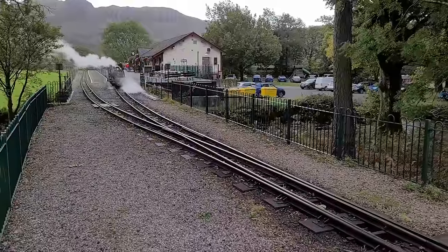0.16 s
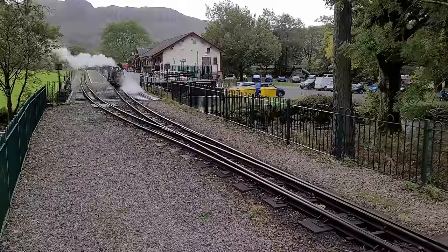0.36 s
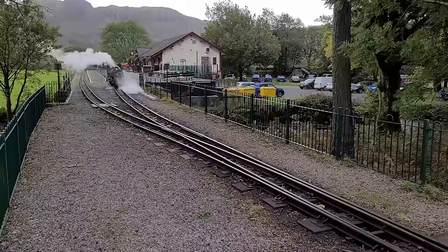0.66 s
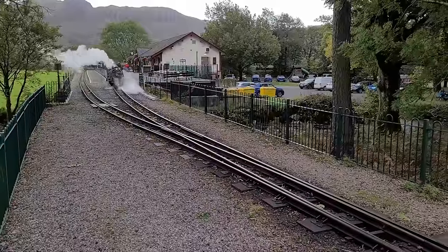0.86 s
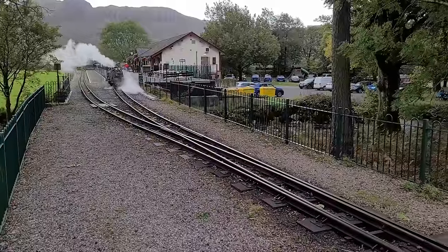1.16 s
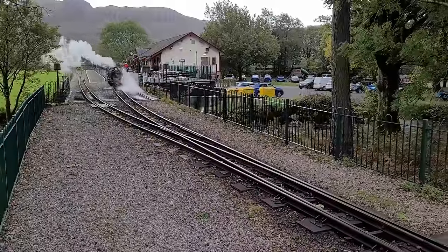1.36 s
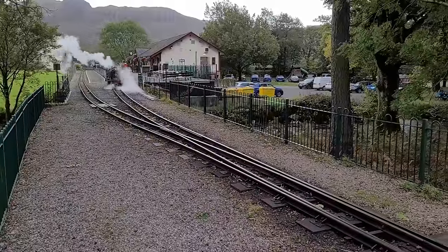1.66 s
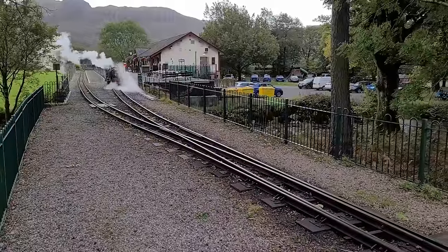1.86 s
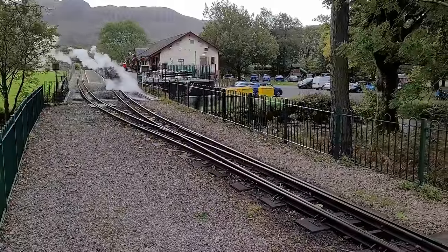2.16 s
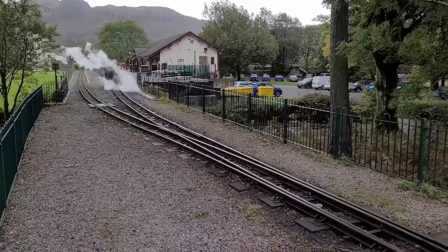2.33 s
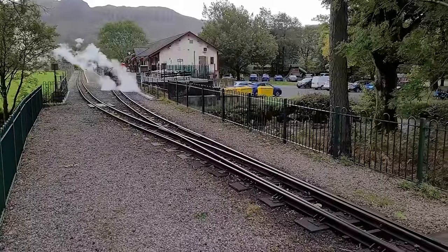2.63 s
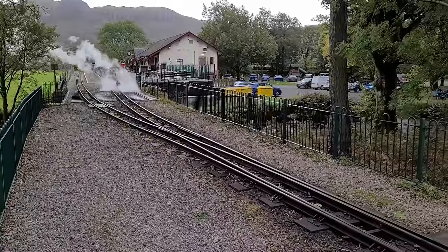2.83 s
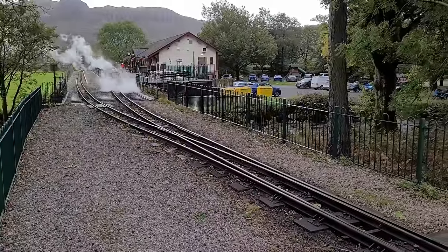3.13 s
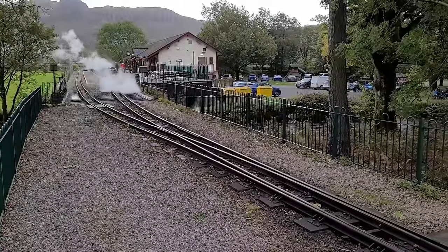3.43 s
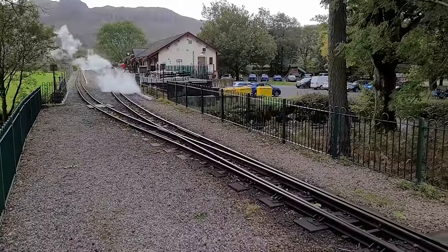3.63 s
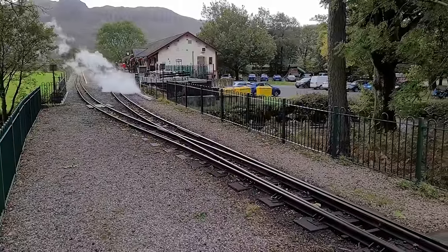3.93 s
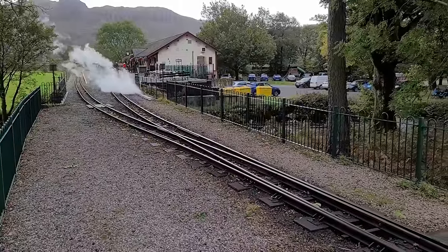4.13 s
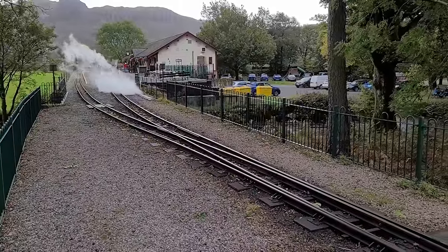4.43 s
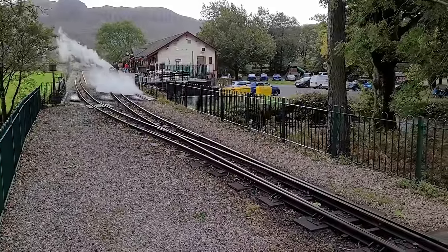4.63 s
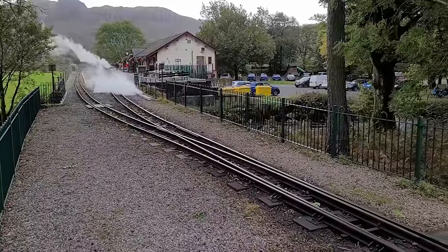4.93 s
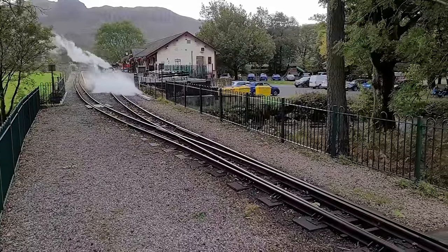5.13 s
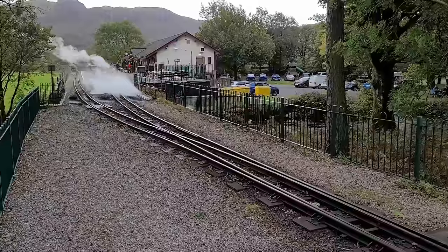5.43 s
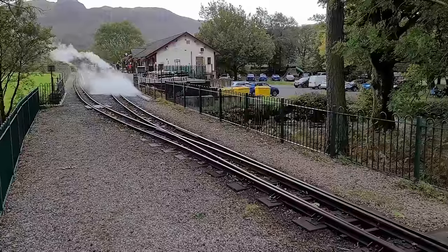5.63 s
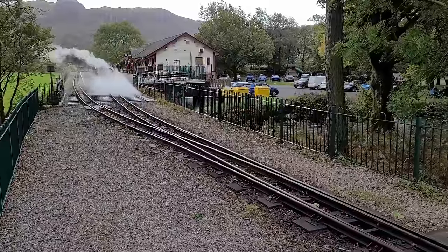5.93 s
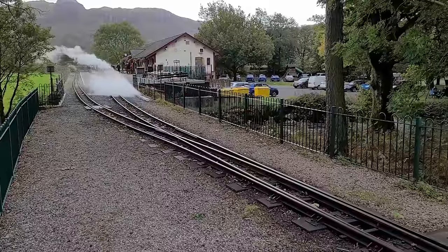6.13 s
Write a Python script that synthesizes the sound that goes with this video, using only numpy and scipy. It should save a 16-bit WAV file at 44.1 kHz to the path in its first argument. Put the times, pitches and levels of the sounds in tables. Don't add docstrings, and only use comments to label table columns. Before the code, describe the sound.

A distant small steam locomotive vents steam, its thin hiss swelling in steps to a wide steady rush while wind buffets the microphone.

```python
import sys
import numpy as np
from scipy import signal
from scipy.fft import rfft, irfft, next_fast_len
from scipy.io import wavfile
from scipy.ndimage import uniform_filter1d, map_coordinates

SR = 44100
rng = np.random.default_rng(int(sys.argv[2]) if len(sys.argv) > 2 else 0)


def gain_from_db(level_db):
    decades = np.asarray(level_db, float) / 20
    return 10 ** decades


def unload_audio(sound):
    columns = np.transpose(np.atleast_2d(sound))
    steps = np.round(np.clip(columns, -1, 1) * 32767)
    wavfile.write(sys.argv[1], SR, steps.astype(np.int16))


N = 276948

# time in seconds, hiss level in dB.
STEAM_FLOW = [(0, -51.5), (.28, -45), (.6, -42), (1.0, -42), (1.4, -41), (1.57, -34.5), (1.85, -35),
              (2.4, -33.5), (2.66, -36), (2.97, -30.5), (3.3, -31), (3.75, -30.5), (4.4, -31.5),
              (5.1, -31.5), (5.7, -31), (6.28, -30.5)]
# frequency in Hz, density in dB per Hz.
JET_COLOUR = [(900, -5), (1150, -2.5), (2100, -4), (4200, -4.5), (5200, -4.5), (6200, -5), (7800, -6.5),
              (9400, 1), (10500, 3), (11800, 2), (13300, 3), (14600, 4), (15500, 2)]
# frequency in Hz, width in Hz, lift in dB.
JET_PEAKS = [(2580, 100, 2.5), (2820, 150, 2), (4960, 80, 3.5), (6770, 75, 8), (8400, 300, 2),
             (10430, 250, 7), (5700, 170, 7), (6120, 200, 6), (3950, 170, 4), (4370, 180, 4),
             (10950, 270, 4), (7440, 120, 5.5)]
# frequency in Hz, width in Hz, lift in dB.
SHELL_PEAKS = [(4650, 110, 1), (5770, 120, -2), (6450, 180, 1), (6800, 150, -2), (7600, 120, -1.5),
               (8480, 200, -0.5), (9000, 150, 3), (9500, 120, 0.5), (9800, 180, 2), (10150, 200, 1),
               (11850, 200, 1), (12350, 250, -1.5), (13000, 250, 0), (13450, 180, -2), (14470, 200, 2.5),
               (15230, 250, 1)]
# frequency in Hz, density in dB per Hz.
CLOUD_COLOUR = [(900, -13), (1150, -9), (2100, -5), (4200, -4.5), (5200, -2.5), (6200, 0), (7800, -3),
                (9400, 0.5), (10500, 5), (11800, -3), (13300, -2), (14600, 0), (15500, -1)]
# frequency in Hz, width in Hz, lift in dB.
CLOUD_PEAKS = [(2520, 120, 1.5), (3200, 170, 1), (4370, 190, 4), (5620, 150, 4), (6050, 150, 0.5),
               (6940, 300, 0)]
# delay in ms, gain as a ratio.
PORT_PATHS = [(-1.706, -0.06), (-0.425, 0.08), (-0.017, -0.13), (0.119, 0.28), (0.21, 0.11), (0.317, 0.05),
              (0.38, 0.17), (0.425, 0.17), (0.454, 0.07), (0.584, 0.12), (0.777, 0.06), (0.833, 0.05),
              (0.947, -0.06), (1.003, -0.06), (1.321, -0.05), (1.559, 0.06), (1.604, 0.1), (1.655, 0.09),
              (1.978, 0.09), (2.035, 0.13), (2.086, 0.06), (2.307, -0.06)]
# delay in ms, ripple in dB.
RIPPLE_LEFT = [(0.465, 0.37), (0.567, 0.3), (0.765, -0.44), (0.845, 0.31), (1.066, -0.29), (1.111, -0.42),
               (1.576, -0.48), (1.82, -0.44), (1.927, 0.46), (2.029, 0.45), (2.092, 0.32), (2.296, -0.23),
               (2.358, 0.31), (2.772, -0.29), (2.885, -0.39), (3.424, 0.35)]
# delay in ms, ripple in dB.
RIPPLE_RIGHT = [(0.295, -0.33), (0.351, -0.48), (0.459, 0.44), (0.522, -0.39), (0.782, -0.31),
                (1.003, 0.42), (1.1, -0.47), (1.213, 0.58), (1.383, 0.44), (1.446, 0.4), (1.576, -0.31),
                (1.638, 0.28), (1.757, -0.3), (1.927, 0.49), (2.347, 0.32), (2.868, -0.26)]
# time in seconds, gain in dB, treble gain in dB, width in ms.
PATH_EDDIES = [(.05, 1, 9.5, 79), (.16, 2, -3, 35), (.33, 2.5, 2, 48), (.4, -3, 1, 32), (.57, -1.5, 3, 32),
               (1.08, 0.5, -2.5, 20), (1.13, -7.5, 6, 18), (1.22, -1.5, 3, 40), (1.56, 0, 1.5, 40),
               (1.81, -0.5, -3, 94), (2.07, -0.5, 4.5, 45), (2.18, 0.5, -2, 31), (2.31, -1.5, 3, 45),
               (2.5, -4, 2, 9.1), (2.71, -2.5, 5, 22), (3.0, 1.5, -2, 45), (3.15, 0.5, 5.5, 46),
               (3.34, 0.5, -2, 47), (3.5, -0.5, 0.5, 83), (3.73, -0.5, -5, 61), (3.95, -1.5, 3, 32),
               (4.25, 2, 0, 17), (4.39, -2.5, 5, 23), (4.78, -0.5, 0.5, 65), (5.29, 1, -1, 64),
               (5.47, -4.5, 1.5, 21), (5.57, 1.5, 0.5, 35), (5.96, -1, 2, 94)]
# time in seconds, throat gain in dB, fizz gain in dB,
# width in ms.
SWIRLS = [(.12, -1, 1.5, 40), (.33, -2.5, -1.5, 50), (.55, -4, -1, 30), (.78, 2.5, 0, 35),
          (.98, -1, -7, 50), (1.2, 1, 2, 30), (1.42, 0.5, .5, 40), (1.67, -0.5, -2, 50), (1.85, 5, 1.5, 61),
          (2.07, 0.5, 2, 35), (2.2, 0, -2, 30), (2.32, 1, 1.5, 25), (2.55, -1.5, -2, 45), (2.67, 3, 1, 33),
          (2.77, 4.5, 4, 25), (2.87, 2.5, 4, 25), (3.0, 0.5, 1, 50), (3.1, 3, 4, 46), (3.2, -1, 1, 30),
          (3.36, 1.5, 6, 30), (3.47, 5, -3, 45), (3.6, -1.5, -3, 40), (3.92, 0.5, 0, 40), (4.1, -2, 0, 45),
          (4.35, -1.5, -1, 40), (4.6, -0.5, 1, 66), (4.95, -0.5, 2, 67), (5.25, 0.5, 3, 38),
          (5.55, 1, 0, 40), (5.72, -0.5, 1, 60), (6.1, 0.5, -0.5, 90)]
# frequency in Hz, left over right in dB.
STEAM_LEAN = [(500, -0.5), (2500, 0.9), (6400, 0.1), (10000, 1.8), (15000, 1.7)]
# time in seconds, wind level in dB, left over right in dB.
BREEZE = [(0, -38.5, 11), (.25, -37.5, 15), (.5, -42.5, 11.5), (.8, -39, 9), (1.3, -42.5, 7),
          (1.68, -32, 5), (2.25, -36, 14), (2.55, -41.5, 17), (3.0, -42.5, 0), (3.35, -44.5, 7),
          (3.75, -38.5, 11), (4.0, -44.5, 4), (4.4, -35, 1), (4.8, -44, 4), (5.1, -40.5, -1),
          (5.35, -40, 10), (5.75, -36.5, -3.5), (6.28, -40.5, -6)]
# time in seconds, left gain in dB, right gain in dB,
# width in ms.
LULLS = [(.02, 1, -19, 32), (.12, -1, -10, 36), (.28, -1.5, -19, 35), (.42, -25, -15, 29),
         (.63, -3, -20, 25), (.93, 3, -2, 18), (1.15, 7, -19, 27), (1.27, 1, -11, 25), (1.39, 5, -11, 31),
         (1.59, -10, -27, 32), (1.79, -3, -22, 43), (2.36, -5, -18, 25), (2.67, -6, -17, 48),
         (2.85, 2, -7, 25), (3.17, 0.5, -24, 50), (3.5, -9, -18, 60), (3.68, 1.5, -7, 28),
         (4.01, -7, -14, 53), (4.42, 3, -20, 32), (4.72, 7.5, -18, 27), (4.86, -9, -1, 13),
         (4.2, -9, -1, 11), (5.06, -16, -4, 30), (5.17, -23, -1, 18), (5.46, -7, -23, 29),
         (5.72, -22, -1, 29), (5.84, 6, -7, 28), (6.05, -7, -13, 25), (6.22, -19, -7, 36)]
# time in seconds, rumble level in dB, flutter level in dB.
GUSTS_LEFT = [(0.052, -33, -27), (0.147, -35, -35), (0.21, -24.5, -28), (0.397, -34, -60),
              (0.444, -35, -62), (0.676, -28, -32), (0.764, -34, -44), (0.812, -41, -35), (0.851, -34, -42),
              (0.99, -32, -60), (1.019, -40, -36), (1.084, -26.5, -31.5), (1.123, -31, -33),
              (1.207, -26.5, -28), (1.419, -31, -57), (1.456, -30, -35), (1.508, -34, -50),
              (1.585, -33, -32.5), (1.669, -32, -32), (1.734, -27, -28), (1.784, -26.5, -35),
              (1.847, -34, -40), (1.873, -36, -36), (1.984, -28, -24.5), (2.009, -27, -28),
              (2.057, -38, -32), (2.106, -25.5, -32), (2.179, -22, -35), (2.242, -19, -25),
              (2.388, -26, -37), (2.415, -24, -34), (2.469, -42, -39), (2.552, -41, -38),
              (2.623, -30.5, -40), (2.767, -32, -48), (3.274, -33, -44), (3.318, -40, -47),
              (3.575, -36, -39), (3.605, -34, -48), (3.722, -27, -29), (3.828, -34, -53), (4.03, -53, -36),
              (4.142, -34, -36), (4.21, -41, -27), (4.277, -24, -23), (4.532, -46, -35), (4.641, -39, -37),
              (4.993, -33, -43), (5.053, -56, -36), (5.105, -49, -33.5), (5.263, -36, -50),
              (5.303, -39, -36), (5.365, -26, -37), (5.456, -31, -34), (5.585, -27.5, -36),
              (5.632, -43, -29), (5.75, -57, -41), (5.876, -37, -33), (5.916, -29, -31), (6.138, -38, -42)]
# time in seconds, rumble level in dB, flutter level in dB.
GUSTS_RIGHT = [(0.055, -59, -33.5), (0.15, -54, -40.5), (0.209, -40, -28), (0.679, -28, -35),
               (0.767, -35, -55), (0.856, -33, -49), (1.019, -47, -35), (1.084, -34, -42),
               (1.126, -54, -32.5), (1.206, -46, -34), (1.463, -36, -47), (1.509, -33, -51),
               (1.591, -58, -41), (1.669, -35, -37), (1.739, -52, -30), (1.844, -49, -45),
               (1.886, -28, -38), (1.951, -45, -35), (2.009, -26, -31), (2.073, -35, -35),
               (2.101, -24, -33.5), (2.192, -25, -33), (2.244, -25, -25), (2.29, -20.5, -30.5),
               (2.378, -56, -34), (2.415, -33, -60), (2.471, -41, -31.5), (2.552, -39, -40),
               (2.766, -32, -49), (2.875, -47, -40), (3.132, -57, -41), (3.257, -55, -37),
               (3.459, -57, -45), (3.58, -54, -39), (3.605, -38, -36), (3.731, -27, -36), (3.93, -46, -40),
               (4.035, -52, -35), (4.137, -35, -38), (4.205, -31, -37), (4.263, -19.5, -25),
               (4.291, -36, -25.5), (4.464, -40, -35.5), (4.507, -40, -41), (4.576, -30, -46),
               (4.642, -43, -33.5), (5.157, -35, -60), (5.221, -36, -60), (5.26, -34, -37),
               (5.303, -34, -34), (5.351, -35, -30.5), (5.444, -53, -31), (5.508, -37, -60),
               (5.582, -32, -42), (5.612, -32, -32), (5.776, -33, -60), (5.874, -37, -34), (5.92, -27, -37),
               (5.952, -35, -40), (6.112, -34, -50)]
# frequency in Hz, density in dB per Hz.
RUMBLE_COLOUR = [(15, -36), (30, -11), (42, 4), (58, 1), (125, -1), (190, -7), (240, -38)]
# frequency in Hz, density in dB per Hz.
FLUTTER_COLOUR = [(150, -42), (210, 1.5), (290, 1), (390, -8.5), (480, -14), (750, -25), (1200, -31),
                  (2000, -55)]
# frequency in Hz, density in dB per Hz.
LEAF_COLOUR = [(250, -25), (500, -18), (750, 7.5), (1000, -6.5), (1500, -2.5), (2500, -6.5), (4000, -9)]
# frequency in Hz, density in dB per Hz.
ROAR_COLOUR = [(170, -48), (225, -5), (262, -6.5), (305, -5), (440, -8), (540, -5), (615, -3), (700, -9.5),
               (820, -15.5), (1000, -22.5), (1400, -70)]

FULL_DB = -31


def unit(x):
    return x / np.sqrt(np.mean(x ** 2, axis=-1, keepdims=True) + 1e-20)


def along(points, hz):
    f, v = np.transpose(points)
    return np.interp(np.log(hz + 1), np.log(f + 1), v, left=-120, right=-120)


def peaks_db(peaks, hz):
    return sum(db / (1 + (2 * (hz - centre_hz) / width) ** 2) for centre_hz, width, db in peaks)


def curves(rows):
    s, *cols = np.transpose(rows)
    return [np.interp(np.arange(N) / SR, s, c) for c in cols]


def passing(rows):
    t = np.arange(0, N, 64) / SR
    s, *dbs, ms = np.transpose(rows)
    bumps = np.exp(-.5 * ((t[:, None] - s) / (ms / 1000)) ** 2)
    return [np.interp(np.arange(N) / SR, t, bumps @ db) for db in dbs]


def wobble(rate):
    return map_coordinates(rng.standard_normal(int(N * rate / SR) + 4), [np.arange(N) * rate / SR])


def filtered(x, response):
    m = next_fast_len(N + 8192)
    return irfft(rfft(x, m) * response(np.fft.rfftfreq(m, 1 / SR)), m)[..., :N]


def echoes(taps, hz):
    ms, gain = np.transpose(taps)
    grid = np.linspace(0, SR / 2, 2048)
    return np.interp(hz, grid, np.exp(-2j * np.pi * np.outer(grid, ms) / 1000) @ gain)


def patchy_pair(patchy_db):
    z = signal.stft(rng.standard_normal((2, N + 512)), nperseg=512)[2]
    field = rng.standard_normal(z.shape[1:])
    field = uniform_filter1d(uniform_filter1d(field, size=9, axis=0), size=8, axis=1)
    field = field - 0.6 * uniform_filter1d(field, size=36, axis=1)
    return signal.istft(z * gain_from_db(patchy_db * field / field.std()), nperseg=512)[1][:, :N]


def at_ports(pair, alike, most=0.77):
    capped = lambda hz: alike(hz) / np.maximum(abs(alike(hz)) / most, 1)
    rest = lambda hz: np.sqrt(np.clip(1 - abs(capped(hz)) ** 2, .02, 1))
    return np.array([pair[0], filtered(pair[0], capped) + filtered(pair[1], rest)])


def ripple_db(hz):
    return np.real([echoes(RIPPLE_LEFT, hz), echoes(RIPPLE_RIGHT, hz)])


def valve_jet():
    def colour(hz):
        onset_db = -9 / (1 + (hz / 1400) ** 4)
        body_db = along([(600, -8), *JET_COLOUR, (17500, -3)], hz)
        peak_db = peaks_db(JET_PEAKS, hz) + peaks_db(SHELL_PEAKS, hz)
        return gain_from_db(body_db + onset_db + peak_db + 1.4 * ripple_db(hz))

    jet = at_ports(patchy_pair(patchy_db=1.36), lambda hz: 1.25 * echoes(PORT_PATHS, hz))
    return filtered(jet, colour)


def steam_cloud():
    def colour(hz):
        body_db = along([(600, -37), *CLOUD_COLOUR, (17500, -12)], hz)
        return gain_from_db(body_db + peaks_db(CLOUD_PEAKS, hz) + 0.48 * ripple_db(hz))

    cloud = at_ports(patchy_pair(patchy_db=1.46), lambda hz: 0.71 * echoes(PORT_PATHS, hz))
    return filtered(cloud, colour)


def five_bands(x):
    below = lambda hz, edge: 1 / (1 + (hz / edge) ** 16)
    edges = (1, 2800, 4200, 7600, 11600, 17000)
    bands = lambda hz: np.array([[below(hz, b) - below(hz, a)] for a, b in zip(edges, edges[1:])])
    return unit(filtered(x, bands))


def cocks():
    half_open_s, opening_s = 3.84, 0.12
    return 1 / (1 + np.exp((half_open_s - np.arange(N) / SR) / opening_s))


def hiss():
    flow_db = curves(STEAM_FLOW)[0] - FULL_DB
    gain_db, bright_db = passing(PATH_EDDIES)
    hiss_db = FULL_DB + flow_db + gain_db

    laws = ((-7.5, 0.77), (-3.37, 1.24), (-7.5, 2))
    breath_db, treble_db, fizz_db = (db + (grows - 1) * flow_db for db, grows in laws)
    breath_db = breath_db - (1 - 0.48) * gain_db
    treble_db = treble_db + bright_db
    throat_db, swirl_db = passing(SWIRLS)
    seats_s, seating_s, seated_db = 3.7, 0.012, -1
    seated = (1 + np.tanh((np.arange(N) / SR - seats_s) / seating_s)) / 2
    fizz_db = fizz_db + 0.68 * bright_db + swirl_db + seated_db * seated

    share_before, share_after = 0.043, 0.92
    share = np.clip(share_before + (share_after - share_before) * cocks(), 0, 1)
    jet_bands, cloud_bands = five_bands(valve_jet()), five_bands(steam_cloud())
    breath, throat, body, treble, fizz = np.sqrt(1 - share) * jet_bands + np.sqrt(share) * cloud_bands

    shimmer = wobble(24) + 0.5 * wobble(16)
    low = gain_from_db(breath_db - 1.14) * breath
    middle = gain_from_db(-1.52) * body + gain_from_db(throat_db - 7.6 - 0.5 * share) * throat
    high = gain_from_db(treble_db + 0.75 * shimmer) * treble + gain_from_db(fizz_db + 0.79 * shimmer) * fizz
    return gain_from_db(hiss_db + 0.3 * wobble(19)) * (low + middle + high)


def low_level(full_db, grows, cocks_db):
    pressure_s = 0.32
    flow_db = uniform_filter1d(curves(STEAM_FLOW)[0], size=int(pressure_s * SR)) - FULL_DB
    return full_db + grows * flow_db + cocks_db * cocks()


def drone(hz=258, width=42):
    pair = at_ports(rng.standard_normal((2, N)), lambda f: 0.9 + 0 * f)
    mode = lambda f: (1j * f * width / (hz * hz - f * f + 1j * f * width)) ** 2
    level_db = low_level(full_db=-46, grows=0.98, cocks_db=-2.8)
    return gain_from_db(level_db + 2.5 * wobble(8.7)) * unit(filtered(pair, mode))


def eddies(colour, evenness):
    x = unit(filtered(rng.standard_normal(N), lambda hz: gain_from_db(along(colour, hz))))
    swell = np.abs(uniform_filter1d(uniform_filter1d(x ** 2, size=600), size=400)) + 0.034
    return unit(x / swell ** (evenness / 2))


def port_wind(rumble_db, flutter_db, gusts, pitch):
    t = np.arange(N) / SR
    restless = 2.5 * wobble(24)
    power = gain_from_db(2 * np.array([rumble_db - 2.2 + restless, flutter_db - 4.0 + 0.69 * restless]))
    for s, gust_rumble_db, gust_flutter_db in gusts:
        ms = 8.9 * np.exp(-0.03 * (max(gust_rumble_db, gust_flutter_db) + 28))
        near = slice(max(round((s - .06) * SR), 0), round((s + .06) * SR))
        width = np.array([[.85], [.45]]) * ms / 1000
        bump = np.exp(-.5 * ((t[near] - s) / width) ** 2)
        power[:, near] += gain_from_db(2 * np.array([[gust_rumble_db + 0.3], [gust_flutter_db + 0.5]])) * bump
    rumble = np.sqrt(power[0]) * eddies(RUMBLE_COLOUR, evenness=0.88)
    flutter = np.sqrt(power[1]) * eddies(np.multiply(FLUTTER_COLOUR, (pitch, 1)), evenness=0.53)
    return rumble + flutter


def wind():
    (wind_db, lean_db), (left_db, right_db) = curves(BREEZE), passing(LULLS)
    flutter_db = -44 + 1 * (wind_db + 39.5)
    sheltered = 0.15
    ports = (
        (left_db + lean_db / 2, GUSTS_LEFT, 1),
        (right_db - lean_db / 2, GUSTS_RIGHT, 1.076),
    )
    both = np.array([port_wind(wind_db + db, flutter_db + sheltered * db, gusts, pitch)
                     for db, gusts, pitch in ports])
    low_cut_hz = 33
    return filtered(both, lambda hz: (1j * hz / (low_cut_hz + 1j * hz)) ** 2 * gain_from_db(1.5))


def trees():
    pair = at_ports(patchy_pair(patchy_db=4.0), lambda hz: 0.063 + 0 * hz)
    return gain_from_db(-53.0) * unit(filtered(pair, lambda hz: gain_from_db(along(LEAF_COLOUR, hz))))


def capsules():
    return gain_from_db(-55) * unit(np.diff(rng.standard_normal((2, N + 3)), n=3))


def roar():
    pair = at_ports(patchy_pair(patchy_db=2.5), lambda hz: 0.64 + 0 * hz)
    level_db = low_level(full_db=-44, grows=0.68, cocks_db=3.13)
    return gain_from_db(level_db) * unit(filtered(pair, lambda hz: gain_from_db(along(ROAR_COLOUR, hz))))


def scene():
    lean_db = lambda hz: np.interp(hz, *np.transpose(STEAM_LEAN)) / 2
    steam = filtered(hiss() + drone() + roar(), lambda hz: gain_from_db([lean_db(hz), -lean_db(hz)]))
    return steam + wind() + trees() + capsules()


def band_limit(x):
    return signal.sosfilt(signal.butter(12, 15830, fs=SR, output="sos"), x)


def record(dry):
    mix = filtered(dry, lambda hz: hz < 15770)
    return band_limit(mix)


dry = scene()
out = record(dry)
unload_audio(out)
```